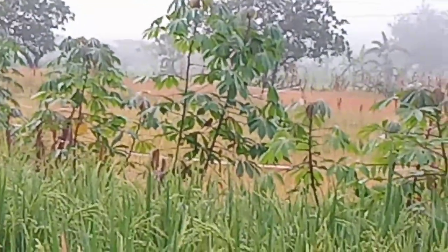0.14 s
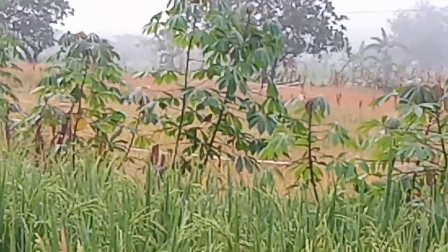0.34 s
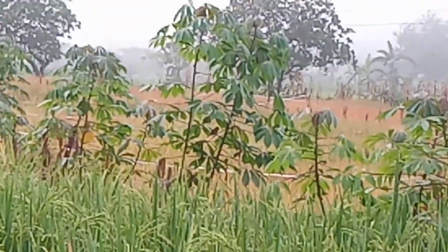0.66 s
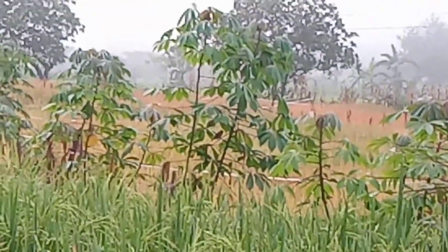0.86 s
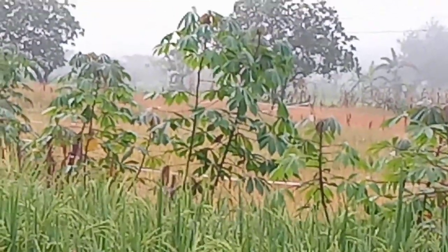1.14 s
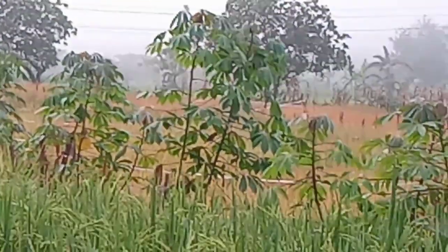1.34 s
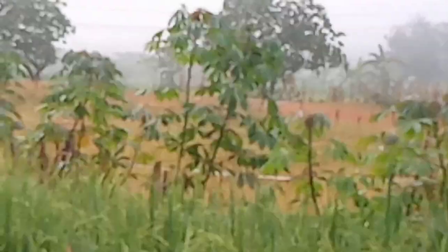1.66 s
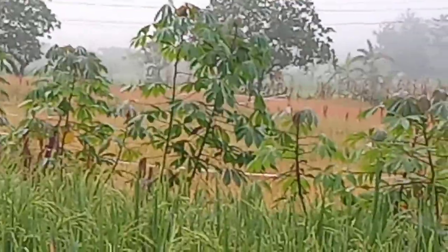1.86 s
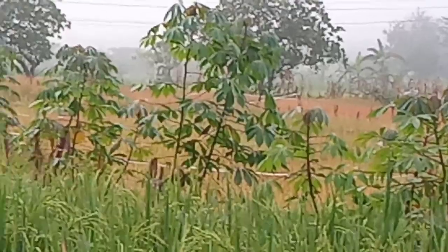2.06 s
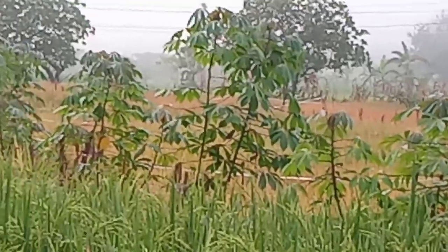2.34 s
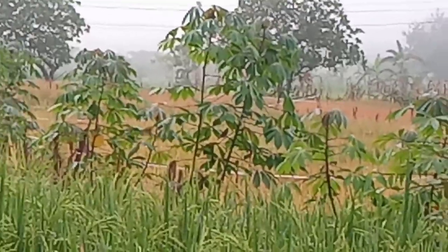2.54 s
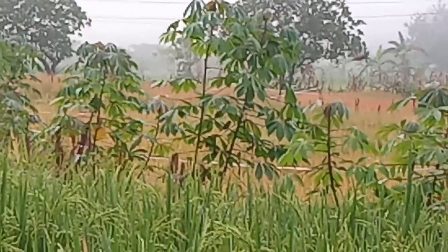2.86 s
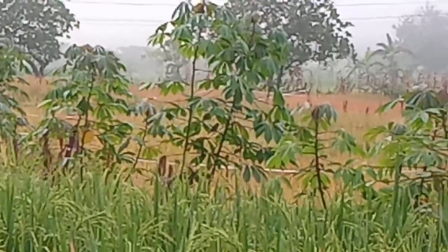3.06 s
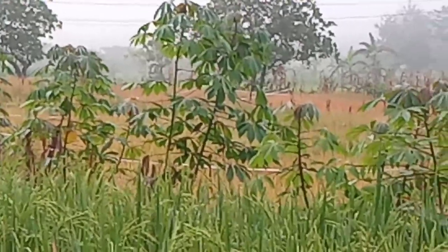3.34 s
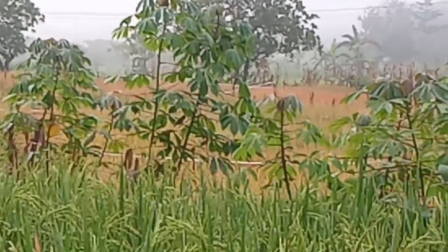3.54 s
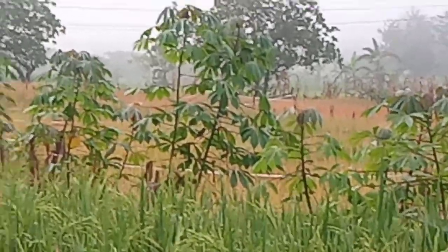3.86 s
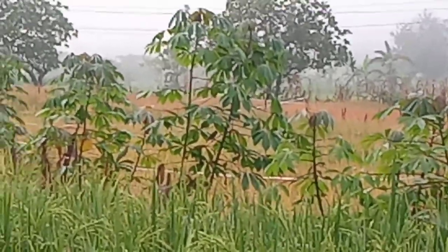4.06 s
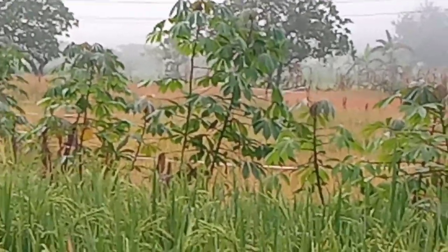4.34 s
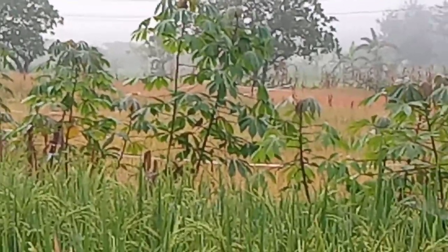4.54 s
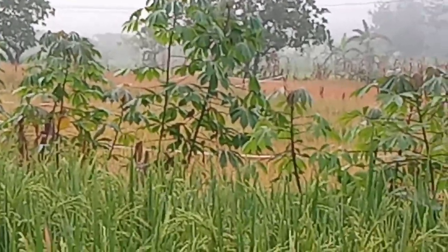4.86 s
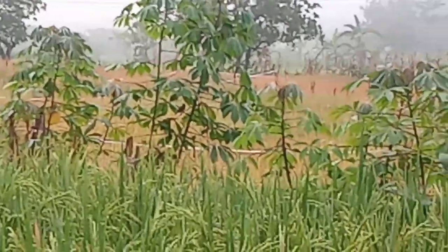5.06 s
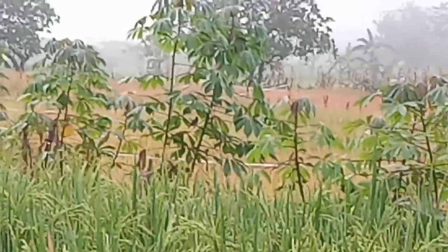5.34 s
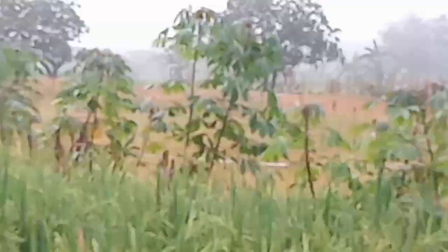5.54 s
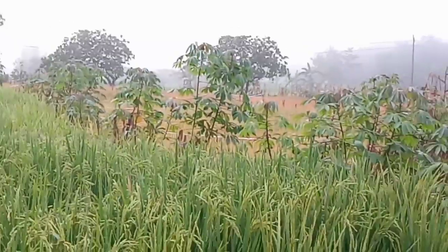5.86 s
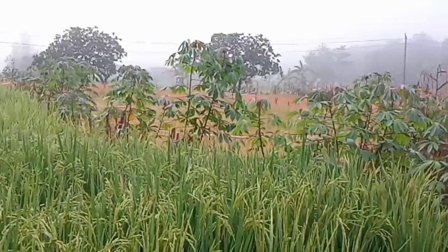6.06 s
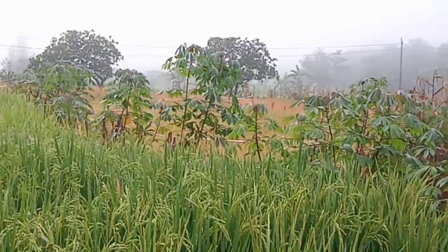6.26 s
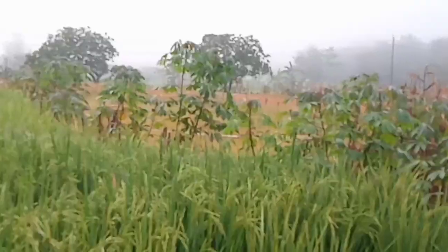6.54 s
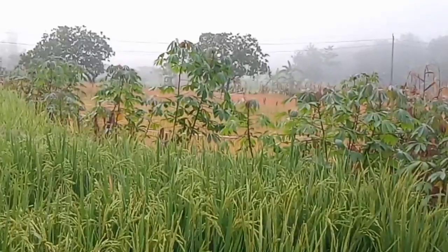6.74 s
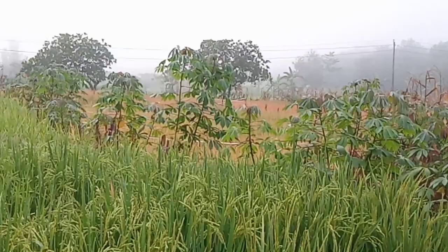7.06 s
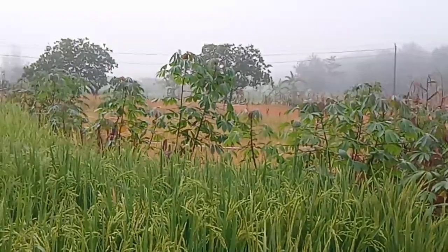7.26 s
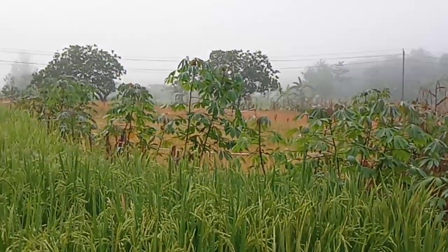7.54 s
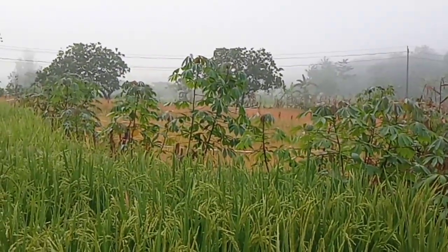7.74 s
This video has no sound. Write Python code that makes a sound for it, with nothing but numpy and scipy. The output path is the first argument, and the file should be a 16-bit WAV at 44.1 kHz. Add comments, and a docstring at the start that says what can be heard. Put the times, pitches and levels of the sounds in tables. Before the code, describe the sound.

Low rumble and a distant engine hum beneath village birdsong, hen-like clucking and chick peeps; later two far roosters crow over each other.

```python
"""A village morning heard from a field, over an engine that slowly gains speed, a low rumble and far-off birds.
A hen-like bird starts clucking at once; small birds, muffled coos and sliding chick peeps soon join in.
Near three seconds come fast trills and a run of insect ticks; after five, two roosters crow over each other.
Bird notes are bending near-sine tones, crows are harmonics through a moving throat, and the engine is a stack
of tones. Rumble, rasp and air are shaped noise, and a fading smear of noise makes the echo."""
import sys
import numpy as np
from scipy import signal
from scipy.fft import rfft, irfft, next_fast_len
from scipy.io import wavfile

SR = 44100
rng = np.random.default_rng(int(sys.argv[2]) if len(sys.argv) > 2 else 0)


def log_audio(samples):
    """Write samples as a 16-bit WAV file to the path given in sys.argv[1]."""
    # one column per channel
    frames = np.atleast_2d(samples).T
    # limit to full scale, then quantise
    limited = np.clip(frames, -1, 1)
    pcm = np.round(limited * 32767).astype(np.int16)
    wavfile.write(sys.argv[1], SR, pcm)


def level_to_linear(level):
    """Convert decibel levels to linear amplitude factors, elementwise."""
    exponent = np.asarray(level, float) / 20
    return 10 ** exponent


N = 347949
T = np.arange(N) / SR  # time of every sample in seconds

# Levels in the tables are those before any flutter, filtering or mixing.
# Strength of the rumble by pitch. Each row: frequency in Hz, relative level in dB per Hz.
RUMBLE_SHAPE = [(28, -30.5), (45, -15.5), (70, -7.5), (100, 2.5), (150, 0.5), (190, -10.5), (260, -22.5),
                (400, -30.5)]
# Rise and fall of the rumble. Each row: time in seconds, level in dB.
RUMBLE_LEVEL = [(0, -51.5), (.6, -46.5), (1.6, -47.5), (2.5, -52), (3.1, -49.5), (3.5, -51), (4.3, -49.5),
                (5.05, -51.5), (6.2, -51.5), (6.9, -56.5), (7.5, -52), (7.89, -51)]
# Strength of the village blur by pitch. Each row: frequency in Hz, relative level in dB per Hz.
AIR_SHAPE = [(270, -5.5), (450, 4), (620, -6), (950, -6.5), (1250, 4.5), (2200, 4.5), (3000, 7.5),
             (4500, -6), (5000, -21)]
AIR_DB = -62.5
# Far engine. Each row: time in seconds, firing rate in Hz, level in dB, brightness in dB per multiple.
ENGINE_COURSE = [(0, 46.46, -61.5, -1.5), (2.002, 51.4, -63, -2), (3.998, 55.21, -67.5, -3.5),
                 (6.002, 58.73, -68.5, -1.5), (7.89, 60.8, -68.5, -3)]
# Tones of the engine. Each row: multiple of the firing rate, added level in dB.
ENGINE_TONES = [(4, -13.5), (7 / 3, -7.5), (2, 2.5), (10 / 3, -0.5), (5.5, -3.5), (5, -12), (7.5, -5)]

# Rise and fall of three distant flocks. Each row: time in seconds, level in dB.
FAR_FOWL_LEVEL = [(0, -59.5), (.6, -72), (1.3, -61.5), (2.4, -66), (2.7, -66.5), (3.5, -74), (4.3, -63),
                  (5.05, -70), (5.5, -50), (6.2, -61), (6.9, -70.5), (7.6, -71.5), (7.89, -55.5)]
FAR_CALLS_LEVEL = [(0, -66), (1.2, -63.5), (2.4, -65), (3.1, -67), (3.6, -71.5), (5.05, -90), (5.5, -59),
                   (6.2, -57.5), (6.9, -70), (7.5, -82), (7.89, -59)]
FAR_BIRDS_LEVEL = [(0, -66.5), (1.2, -59.5), (1.5, -65), (2.4, -59.5), (2.6, -69.5), (3.1, -54),
                   (4.3, -71.5), (5.5, -59.5), (6.2, -60), (6.9, -74), (7.5, -63.5), (7.89, -88)]
# Far insects, with a brief rustling hiss near 1.3 s. Each row: time in seconds, level in dB.
FAR_HIGH_LEVEL = [(0, -90), (1.26, -90.5), (1.34, -74.5), (1.5, -91), (2.4, -84), (2.6, -90), (3.6, -85),
                  (5.05, -93), (5.5, -84), (6.2, -92.5), (7.5, -88.5), (7.89, -95)]

# Low muffled coos, perhaps doves. Each row: start in seconds, length in seconds, pitch in Hz, level in dB.
COO_NOTES = [(0.61, 0.21, 297, -66), (3.353, 0.14, 336, -70.5), (3.84, 0.13, 334, -68.5),
             (4.294, 0.27, 339.5, -67), (5.502, 0.18, 349, -66.5), (5.804, 0.15, 279, -67.5),
             (7.603, 0.084, 439, -67), (7.795, 0.083, 420, -65.5)]
# Small birds' gliding or held notes, and two low notes near 1000 Hz, perhaps another rooster.
# Each row: start in seconds, length in seconds, start pitch in Hz, end pitch in Hz, level in dB.
GLIDE_NOTES = [(.227, 0.071, 2400, 2385, -58), (0.237, 0.029, 3340, 3300, -59.5),
               (0.316, 0.17, 2610, 2550, -61), (0.413, .03, 3300, 2730, -64),
               (0.681, 0.06, 2160, 2490, -64.5), (0.752, 0.22, 2480, 2390, -65),
               (1.08, 0.075, 2580, 2310, -56), (1.234, 0.063, 2042, 2320, -62.5),
               (1.284, .086, 2520, 2420, -58.5), (1.977, .042, 2830, 2840, -61),
               (2.268, .054, 3900, 3650, -61.5), (2.442, 0.043, 3700, 3300, -59),
               (2.533, 0.091, 2380, 2730, -62.5), (2.95, .11, 2880, 3015, -60.5),
               (2.981, 0.033, 2500, 3660, -56), (2.997, 0.044, 3760, 3640, -57),
               (3.083, 0.027, 3700, 2940, -50.5), (3.095, 0.044, 2840, 2927, -47),
               (3.152, 0.028, 3070, 2400, -45), (3.762, 0.12, 2770, 2760, -61.5),
               (3.979, .022, 3830, 3300, -64), (4.253, 0.078, 2480, 2710, -67),
               (4.555, 0.029, 3400, 3280, -61), (4.713, 0.13, 2530, 2520, -64),
               (4.088, .03, 4000, 3800, -61), (5.011, 0.057, 3580, 3530, -63),
               (5.071, .055, 3480, 2750, -64.5), (5.655, .08, 980, 1002, -56), (6.17, 0.08, 1016, 970, -57),
               (3.603, 0.088, 2053, 1977, -65.5), (3.691, 0.082, 1955, 1550, -68),
               (5.182, .016, 4100, 3620, -58.5), (5.282, 0.012, 3450, 4000, -58),
               (5.293, 0.023, 3720, 3200, -56), (5.327, .019, 3940, 3280, -54),
               (5.339, 0.025, 3790, 2980, -54), (5.474, 0.018, 3760, 3800, -57.5),
               (5.531, 0.079, 2070, 2090, -61.5), (5.557, 0.11, 2850, 2710, -61.5),
               (6.094, 0.038, 3350, 3310, -61.5), (6.277, 0.042, 3800, 3020, -61.5),
               (6.37, 0.079, 2433, 2225, -62), (6.377, 0.032, 2620, 2593, -50),
               (6.8, 0.016, 3250, 4080, -61), (7.019, 0.037, 3080, 2900, -59),
               (7.107, 0.024, 2480, 2450, -58.5), (7.188, .11, 2420, 2453, -61),
               (7.219, 0.04, 3135, 3190, -60), (7.308, 0.095, 2470, 2500, -61.5),
               (7.409, .049, 2520, 2630, -53.5), (7.447, 0.06, 3500, 3400, -54),
               (7.457, .046, 3520, 2610, -56), (7.501, 0.041, 2820, 3180, -55)]
# Small birds' arched chirps.
# Each row: start in seconds, length in seconds, top pitch in Hz, depth as a share of the top, level in dB.
BIRD_ARCHES = [(.315, 0.055, 3920, 0.098, -67), (.383, 0.027, 3900, .15, -59.5),
               (.894, .045, 4170, 0.053, -60.5), (.925, 0.045, 3850, .18, -62),
               (1.129, 0.026, 2790, 0.063, -55), (1.373, 0.076, 2685, 0.066, -54),
               (1.433, .03, 2750, 0.11, -54), (1.944, 0.12, 2569, 0.057, -61.5),
               (2.03, 0.041, 4370, 0.11, -64.5), (2.079, 0.091, 2690, 0.032, -63),
               (2.877, 0.04, 2924, .05, -53), (2.88, 0.03, 3240, 0.08, -60),
               (3.125, 0.063, 3400, 0.067, -52.5), (6.84, 0.044, 3820, 0.057, -66)]
ARCH_LEAN = 1.2  # the end drops this many times as deep as the start

# Insect ticks: evenly spaced at first, then later, lower and fainter towards the last one
TICK_START_S, TICK_GAP_S, TICK_COUNT, TICK_HZ, TICK_DB = 3.309, .0615, 17, 7060, -60.5
TIRE_S, TIRE_HZ, TIRE_DB, TIRE_POWER = .0516, -230, -12, 6  # change by the last tick; how late it sets in
OFFBEAT_TICK_S, OFFBEAT_TICK_DB = 0.025, -11  # delay and relative level of a fainter tick between the main ones

# Trill bursts. Each row: start in seconds, number of notes, level in dB.
TRILL_BURSTS = [(3.116, 4, -50), (3.364, 3, -48), (3.607, 3, -50.5)]
# One falling trill note: length in seconds, start pitch in Hz, middle pitch in Hz, end pitch in Hz.
TRILL_SHAPE = (0.021, 5550, 5100, 4600)
TRILL_GAP_S, TRILL_START_DB = .0339, -5  # start to start; the first note is softer, each next by half as much

# Chicks' peeps. Each row: start in seconds, length in seconds, top pitch in Hz, end pitch in Hz, level in dB.
CHICK_PEEPS = [(1.009, 0.18, 4840, 3830, -67), (1.37, 0.13, 4830, 4130, -72),
               (1.851, 0.19, 4730, 3960, -72), (2.184, 0.13, 5040, 4030, -70),
               (2.645, 0.19, 4700, 3850, -66.5), (3.049, .124, 4950, 4100, -71),
               (3.248, .045, 4540, 4070, -54.5), (3.516, .2, 4630, 3800, -67),
               (3.739, 0.085, 4900, 4730, -79), (3.98, 0.12, 4830, 3780, -70.5),
               (4.264, 0.043, 3990, 3600, -67), (4.357, 0.2, 4610, 3740, -65.5),
               (4.812, .05, 4520, 4300, -62), (5.182, 0.17, 4610, 3750, -62), (5.61, .11, 4820, 4300, -65),
               (6.021, 0.17, 4550, 3802, -62.5), (6.225, .06, 4670, 3980, -59),
               (6.483, 0.094, 4700, 3850, -69.5), (6.876, 0.18, 4540, 3700, -61.5),
               (7.27, 0.17, 4860, 3870, -69)]
HOOK_S, HOOK_FROM, HOOK_DB = .015, .95, -1  # lead time, start pitch as a share of the top, relative level
PEEP_BOW = 1.008  # middle pitch compared with a straight fall

# Openings of the low bird's phrases. Each row: start in seconds, held length in seconds, level in dB.
HEN_STARTS = [(0.098, .039, -59), (0.698, 0.035, -61), (2.549, 0.12, -57), (4.043, 0.053, -60),
              (7.427, 0.099, -62), (7.829, 0.035, -58.5)]
# The rising pip: length in seconds, start pitch in Hz, middle pitch in Hz, end pitch in Hz.
HEN_PIP_SHAPE = (.025, 920, 1000, 1150)
# The held note: start pitch in Hz, middle pitch in Hz, end pitch in Hz.
HEN_HELD_SHAPE = (1287, 1290, 1260)
# Low bird's arched clucks. Each row: start in seconds, length in seconds, top pitch in Hz, level in dB.
HEN_CLUCKS = [(.005, 0.016, 1220, -60.5), (.2, .045, 1245, -65), (.87, 0.033, 1214, -65),
              (1.045, 0.024, 1035, -63), (1.2, 0.03, 1140, -65), (2.712, 0.032, 1306, -54.5),
              (2.785, 0.029, 1238, -52.5), (2.872, 0.052, 1240, -56.5), (2.975, 0.11, 1290, -57.5),
              (4.212, .04, 1166, -60), (4.282, .03, 1086, -57.5), (4.36, .045, 1090, -60),
              (4.46, 0.037, 1083, -68), (4.545, 0.023, 1110, -61), (7.318, 0.02, 1252, -55.5),
              (7.575, 0.05, 1150, -63), (7.635, 0.049, 1085, -58.5), (7.745, 0.018, 1060, -57)]
# Cluck ends: start pitch and end pitch, both as shares of the top.
CLUCK_ENDS = (.8, .84)

# Two roosters' syllables. Each row: start in seconds, length in seconds, starting pitch in Hz, starting level
# in dB, level change in dB per second, throat resonance at the start in Hz.
FIRST_ROOSTER = [(5.13, 0.25, 549.7, -54.5, 8, 806), (5.45, 0.23, 730.8, -45, -25, 1200),
                 (5.71, .46, 729, -53.5, -20.5, 900), (6.29, 0.45, 698.5, -44, -30, 1400)]
SECOND_ROOSTER = [(5.22, 0.15, 637, -55.5, -6, 780), (5.44, .19, 630.4, -46, -41.5, 700),
                  (5.72, 0.3, 640.5, -56.5, -14.5, 920), (6.18, 0.5, 627, -56.5, -10, 1295)]
# Hoarse part of the crowing. Each row: time in seconds, level in dB, base pitch in Hz.
CROW_RASP = [(5.1, -100, 1202), (5.16, -59.5, 1202), (5.401, -58, 1250), (5.48, -56, 1245),
             (5.56, -63.5, 1260), (5.781, -48.5, 1324), (5.971, -52.5, 1290), (6.099, -65.5, 1285),
             (6.221, -55.5, 1205), (6.4, -63, 1231), (6.75, -72, 1278)]
CROW_ATTACK_S, CROW_RELEASE_S = 0.018, .06
THROAT_Q, THROAT_FALL_OCT_PER_S, SOURCE_DB_PER_HARMONIC = 1.68, 1.28, -1
BEAK_TOP_HZ = 1850  # harmonics above this fade steeply

ECHO_T60_S, ECHO_DB = 0.52, -3  # time to fade by 60 dB; level of the near calls sent to the echo
LEAVES_HZ = 3240  # foliage soaks up the near calls' echo above this
HISS_DB = -86


def level(x, db):
    """Scale a sound to a chosen average (rms) level."""
    return x * level_to_linear(db) / np.sqrt(np.mean(x ** 2))


def coloured(shape):
    """Noise of rms 1 with a spectrum of (Hz, dB) points and next to nothing beyond them."""
    hz, db = np.transpose(shape)
    size = next_fast_len(N)
    bins = np.arange(size // 2 + 1) * SR / size + 1  # 1 Hz up, so the logarithm works
    gain = level_to_linear(np.interp(np.log(bins), np.log(hz), db, left=-90, right=-90))
    return level(irfft(rfft(rng.standard_normal(size)) * gain, size)[:N], 0)


def walk(rate):
    """Random wander through about rate new values a second, with a spread near 1."""
    knots = rng.standard_normal(int(N / SR * 400))
    return 1.2 * np.interp(T * min(rate, 390), np.arange(len(knots)), knots)


def swell(curve):
    """Loudness factor over time from (s, dB) points."""
    return level_to_linear(np.interp(T, *np.transpose(curve)))


def rumble():
    """Low noise with a slowly changing level and a slight waver."""
    return swell(RUMBLE_LEVEL) * coloured(RUMBLE_SHAPE) * level_to_linear(0.52 * walk(9))


def air():
    """The blur of the whole village: quarter-octave noise bands that come and go on their own."""
    hz, db = np.transpose(AIR_SHAPE)
    out = 0
    for centre in 270 * 2 ** np.arange(0, 4.3, .25):
        band = coloured([(centre / 1.25, -20), (centre, 0), (min(centre * 1.25, 5300), -20)])
        # a higher band is wider, so it holds more power
        share_db = np.interp(np.log(centre), np.log(hz), db) + 10 * np.log10(centre)
        out = out + band * level_to_linear(share_db + 3 * walk(4) + 1.5 * walk(14))
    return level(out, AIR_DB)


def engine():
    """Tones at multiples of the firing rate; each fades in and out as the air between shifts."""
    s, *columns = np.transpose(ENGINE_COURSE)
    hz, db, tilt_db = (np.interp(T, s, c) for c in columns)
    phase = 2 * np.pi * np.cumsum(hz * (1 + 0.00795 * walk(5))) / SR
    out = np.zeros(N)
    for k, own_db in ENGINE_TONES:
        tone_db = db + own_db + tilt_db * k + 5.26 * walk(6)
        out += level_to_linear(tone_db) * np.sqrt(2) * np.sin(k * phase + k)
    return out


def whistles(notes, edge, flutter_db, warble):
    """Near-sine notes: pitch bends through three points and warbles, level swells and flutters."""
    out = np.zeros(N + SR)
    flutter = level_to_linear(flutter_db * walk(70))
    waver = np.pad(1 + warble * walk(170), (0, SR), "edge")
    for s, length, *hz, db in notes:
        u = np.linspace(0, 1, max(int(length * SR), 8))  # progress through the note
        i = max(int(s * SR), 0)
        pitch = np.polyval(np.polyfit([0, .5, 1], hz, deg=2), u) * waver[i:i + len(u)]
        fade = np.sin(np.pi / 2 * np.clip(np.minimum(u, 1 - u) / edge, 0, 1)) ** 2
        out[i:i + len(u)] += np.sqrt(2) * level_to_linear(db) * fade * np.sin(2 * np.pi * np.cumsum(pitch) / SR)
    return out[:N] * flutter


def arched(rows, feet):
    """Notes that climb to their top pitch and drop again."""
    return [(s, length, feet[0] * hz, hz, feet[1] * hz, db) for s, length, hz, db in rows]


def chorus(lo_hz, hi_hz, length, bend, warble, count):
    """Many distant callers: short notes of random time, length, pitch, bend and strength, at rms 1."""
    s, place, span, rise, fall, strength = rng.random((count, 6)).T
    hz = lo_hz * (hi_hz / lo_hz) ** place
    start_hz, end_hz = hz * (1 + bend * (rise - .3)), hz * (1 - bend * fall)
    notes = np.transpose([s * N / SR, length * (.3 + span), start_hz, hz, end_hz, 8 * strength])
    return level(whistles(notes, 0.27, 2.5, warble), 0)


def distant_layers():
    """Far flocks as crowds of short notes; far insects and a brief rustling hiss as notes over noise."""
    far = swell(FAR_FOWL_LEVEL) * chorus(582.2, 781.5, .07, 0.066, 0.0738, count=400)
    far = far + swell(FAR_CALLS_LEVEL) * chorus(998.4, 1453, .04, 0.078, 0.032, count=300)
    far = far + swell(FAR_BIRDS_LEVEL) * chorus(2200, 4700, 0.0301, 0.1605, 0.014, count=700)
    far = far + level_to_linear(-74) * chorus(4200, 4900, .012, .05, 0.012, count=900)
    high_noise = coloured([(5400, 1.0), (6400, 4), (7100, 6.5), (7280, 0.5), (8600, -6.5)]) * level_to_linear(1.3 * walk(25))
    high_notes = chorus(6150, 7150, 0.017, 0.023, 0.012, count=300)
    return far + swell(FAR_HIGH_LEVEL) * (high_noise + 1.05 * high_notes)


def coos():
    """Low notes around a steady pitch, softly edged, with strong warble and flutter."""
    return whistles([(s, length, hz, hz, hz, db) for s, length, hz, db in COO_NOTES], 0.34, 4.7, 0.08)


def chatter():
    """Small birds' notes that glide, hold or arch, and two low notes, perhaps another rooster."""
    glides = [(s, length, a, (a + b) / 2, b, db) for s, length, a, b, db in GLIDE_NOTES]
    arches = [(s, length, hz * (1 - depth), hz, hz * (1 - ARCH_LEAN * depth), db)
              for s, length, hz, depth, db in BIRD_ARCHES]
    return whistles(glides + arches, 0.14, 2.74, .02)


def insect():
    """Each tick rings the body for a few milliseconds; fainter ticks fall between the main ones."""
    out = np.zeros(N)
    t = np.arange(int(.05 * SR)) / SR
    for k in range(TICK_COUNT):
        tired = (k / (TICK_COUNT - 1)) ** TIRE_POWER
        i = int((TICK_START_S + k * TICK_GAP_S + TIRE_S * tired) * SR)
        hz = TICK_HZ + TIRE_HZ * tired + 50 * rng.standard_normal()
        envelope = (1 - np.exp(-t / 0.0013)) * np.exp(-t / 0.0058)
        bent_time = t - .00015 * (1 - np.exp(-t / .0015))  # the pitch snaps up at the start
        out[i:i + len(t)] += level_to_linear(TICK_DB + TIRE_DB * tired) * envelope * np.sin(2 * np.pi * hz * bent_time)
    late = int(OFFBEAT_TICK_S * SR)
    return out + level_to_linear(OFFBEAT_TICK_DB) * np.pad(out, (late, 0))[:N]


def trill():
    """Evenly spaced falling notes that grow within each burst."""
    notes = [(s + k * TRILL_GAP_S, *TRILL_SHAPE, db + TRILL_START_DB / 2 ** k)
             for s, count, db in TRILL_BURSTS for k in range(round(count))]
    return whistles(notes, 0.83, .3, 0)


def chicks():
    """Each peep hooks up to its top and slides down."""
    hooks = [(s - HOOK_S, 1.4 * HOOK_S, HOOK_FROM * top, .99 * top, top, db + HOOK_DB)
             for s, _, top, _, db in CHICK_PEEPS]
    falls = [(s, length, top, PEEP_BOW * (top + end) / 2, end, db) for s, length, top, end, db in CHICK_PEEPS]
    return whistles(hooks + falls, 0.12, 2.2, .005)


def hen():
    """The low bird's near-sine phrase: rising pips, each leading to a held note, and arched clucks."""
    pips = [(s, *HEN_PIP_SHAPE, db) for s, _, db in HEN_STARTS]
    held = [(s + HEN_PIP_SHAPE[0], length, *HEN_HELD_SHAPE, db) for s, length, db in HEN_STARTS]
    return whistles(pips + held + arched(HEN_CLUCKS, CLUCK_ENDS), 0.09, 2.2, 0.018)


def hoarse():
    """Breath rasping through the crowing throats: two wavering resonances of noise."""
    s, db, hz = np.transpose(CROW_RASP)
    phase = 2 * np.pi * np.cumsum(np.interp(T, s, hz)) / SR
    # multiplying slow noise by a tone moves it up around that tone
    low = coloured([(5, -5.0), (120, -5.5), (300, -9.0), (600, -20.0)]) * np.sin(.9 * phase)
    high = level_to_linear(-3.0) * coloured([(5, -2.5), (90, 1.5), (250, -13.5), (500, -36)]) * np.sin(1.42 * phase)
    return (low + high) * level_to_linear(np.interp(T, s, db, left=-120, right=-120) + 2.6 * walk(16))


def crow(syllables, pitch_per_db, jitter, shimmer_db):
    """Three shaky harmonics, pitch following effort, in a throat resonance that sinks as the beak closes."""
    out = np.zeros(N)
    for s, length, hz, db, change_db, throat_hz in syllables:
        t = np.clip(T - s, 0, length)
        gate = np.clip(np.minimum(t / CROW_ATTACK_S, (length - t) / CROW_RELEASE_S), 0, 1)
        pitch = hz * (1 + pitch_per_db * change_db * t)
        throat = throat_hz * 2 ** (-THROAT_FALL_OCT_PER_S * t)
        phase = 2 * np.pi * np.cumsum(pitch * (1 + jitter * walk(90))) / SR
        for k in range(1, 4):
            ring = 1 / np.hypot(1, THROAT_Q * (k * pitch / throat - throat / (k * pitch)))
            ring = ring / (1 + (k * pitch / BEAK_TOP_HZ) ** 10)
            shimmer = shimmer_db * (walk(45) + walk(11))
            own_db = db + change_db * t + SOURCE_DB_PER_HARMONIC * (k - 1) + shimmer
            out += gate * ring * level_to_linear(own_db) * np.sqrt(2) * np.sin(k * phase)
    return out


def roosters():
    """Two voices crowing over each other, with their shared rasp."""
    return crow(FIRST_ROOSTER, .005, .011, 2.2) + crow(SECOND_ROOSTER, .003, .022, 2.5) + hoarse()


def echo(x):
    """Trees and walls return a dense, fading smear."""
    t = np.arange(int(.8 * SR)) / SR
    fade = np.exp(-np.log(1000) * t / ECHO_T60_S) * np.clip(t / 0.012, 0, 1)
    tail = rng.standard_normal(len(t)) * fade
    return signal.fftconvolve(x, tail / np.sqrt(np.sum(tail ** 2)))[:N]


def scene():
    """All calls with their echo, over the rumble, the air and the engine."""
    far = distant_layers()
    near = coos() + chatter() + roosters()
    close = insect() + trill() + chicks()
    fowl = hen()
    dull = signal.sosfilt(signal.butter(2, LEAVES_HZ, fs=SR, output="sos"), near)
    # each group has its own share of echo
    wet = echo(level_to_linear(ECHO_DB) * dull + level_to_linear(-8.5) * fowl + 0.15 * close + 0.44 * far)
    background = rumble() + air() + engine()
    return (near + fowl + close + 0.54 * far + wet + background)[None]


def top_cut(x):
    """Nothing passes above the cut-off."""
    return signal.sosfilt(signal.butter(12, 15480, fs=SR, output="sos"), x)


def record(dry):
    """Adds the steady noise of the microphone and returns the finished mix."""
    mix = dry + level_to_linear(HISS_DB) * rng.standard_normal(dry.shape)
    return top_cut(mix)


dry = scene()
out = record(dry)
log_audio(out)
```